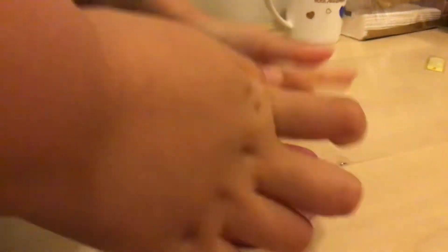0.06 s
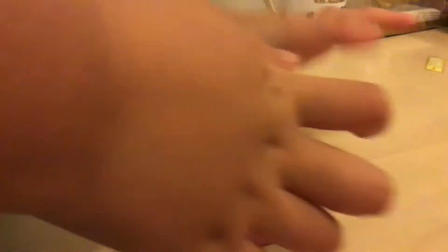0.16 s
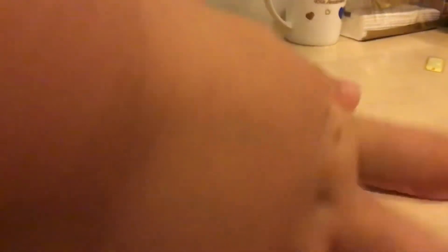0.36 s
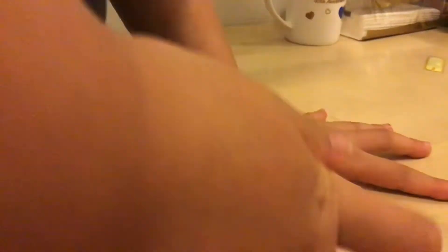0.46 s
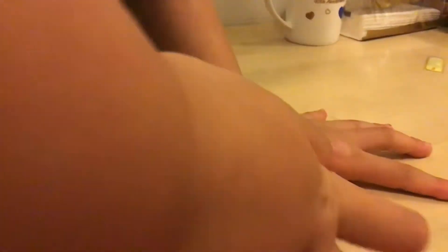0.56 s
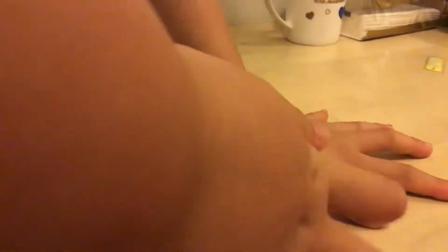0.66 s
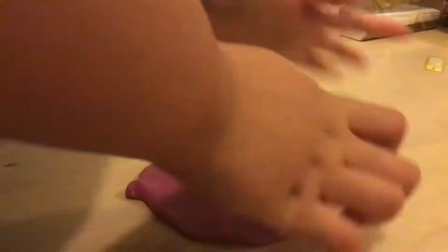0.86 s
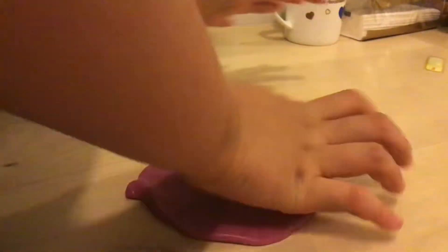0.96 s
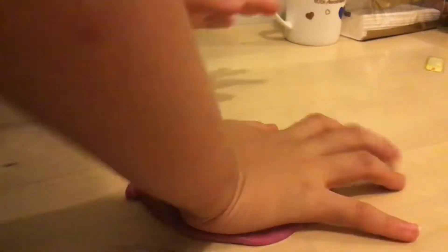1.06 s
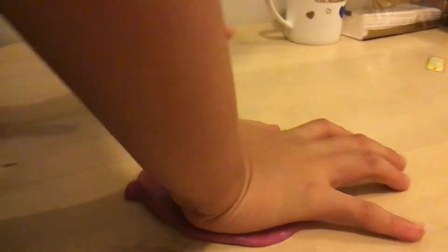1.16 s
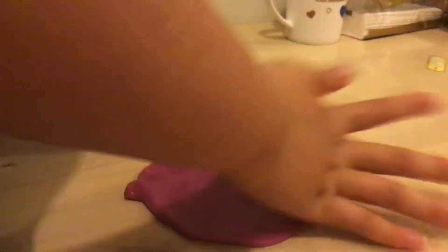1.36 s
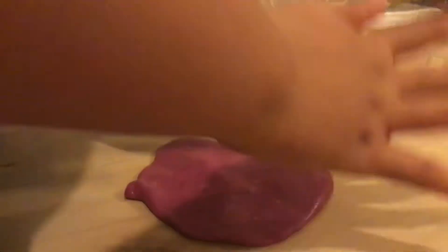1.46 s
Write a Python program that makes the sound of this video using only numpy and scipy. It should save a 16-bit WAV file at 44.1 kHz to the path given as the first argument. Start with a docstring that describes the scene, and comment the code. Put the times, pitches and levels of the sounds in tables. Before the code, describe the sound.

One sharp, wet slap of putty on a wooden table, followed by faint sticky ticks.

```python
"""A low, steady hum fills a small, quiet room. Then a hand slaps soft putty flat on a wooden table.
The putty crackles wetly, trapped air snaps out, the table top thumps and rings, and the room
answers briefly. Afterwards the hand knocks softly on the table, and the putty gives two sticky
ticks, soft rubs and a faint squeak as the palm leans on it."""
import sys
import numpy as np
from scipy import signal
from scipy.fft import rfft, irfft
from scipy.io import wavfile

SR = 44100
rng = np.random.default_rng(int(sys.argv[2]) if len(sys.argv) > 2 else 0)


def output_pcm(signal):
    """Save a mono or channel-first signal as 16-bit PCM at the path in sys.argv[1].

    Samples are clipped to [-1, 1] before scaling.
    """
    pcm = np.clip(np.atleast_2d(signal).T, -1, 1) * 32767
    wavfile.write(sys.argv[1], SR, np.round(pcm).astype(np.int16))


N = 66150
T = np.arange(N) / SR
FREQS_HZ = np.fft.rfftfreq(N, 1 / SR)
SLAP_S = 0.2415   # when the putty lands


def from_db(db):
    """Turn decibels into a number to multiply by."""
    return 10 ** (np.asarray(db) / 20)


def rms_one(x):
    """Scale a sound so its average strength (rms) is 1."""
    return x / np.sqrt(np.mean(x ** 2) + 1e-20)


def noise(colour):
    """Noise of strength 1; the colour table says which pitches are stronger than others."""
    pitch_hz, level_db = np.array(colour).T
    curve_db = np.interp(np.log(np.maximum(FREQS_HZ, 1)), np.log(pitch_hz), level_db)
    return rms_one(irfft(rfft(rng.standard_normal(N)) * from_db(curve_db), N))


def drift(rate_hz):
    """A random wobble of strength 1; a higher rate wobbles faster."""
    return rms_one(irfft(rfft(rng.standard_normal(N)) / (1 + (FREQS_HZ / rate_hz) ** 4), N))


def click(time_s):
    """One instant push."""
    x = np.zeros(N) + 1e-18
    x[int(time_s * SR)] = 1
    return x


def ring(force, modes):
    """A push sets off fading tones (modes); each takes its ring_s to fall by 60 dB."""
    out = 0
    for pitch_hz, level_db, ring_s in modes:
        decay = np.exp(-np.log(1000) / (ring_s * SR))
        angle = 2 * np.pi * pitch_hz / SR
        tone = signal.lfilter([0, np.sin(angle)], [1, -2 * decay * np.cos(angle), decay ** 2], force)
        out = out + from_db(level_db) * tone
    return out


def swells(rows):
    """Loudness rises and falls in a bell shape for each row."""
    return sum(from_db(level_db) * np.exp(-.5 * ((T - peak_s) / half_width_s) ** 2)
               for peak_s, level_db, half_width_s in rows)


def filtered(x, kind, edge_hz, order):
    """Keep the low pitches, the high ones or a band; a higher order cuts more steeply."""
    return signal.sosfilt(signal.butter(order, edge_hz, kind, fs=SR, output="sos"), x)


# the tones of the hum: pitch_hz, level_db
HUM_TONES = [(86.1, -62), (150.7, -68.5), (199.2, -62.5), (262.5, -61.5), (495.3, -75.5), (593, -64.5)]
def hum():
    """An appliance hums, each tone wavering gently."""
    out = 0
    for pitch_hz, level_db in HUM_TONES:
        waver = 1 + 0.056 * (drift(rate_hz=15) + 1j * drift(rate_hz=15))   # in loudness and pitch
        tone = np.exp(2j * np.pi * (pitch_hz * T + rng.random()))
        out = out + from_db(level_db) * rms_one(np.real(waver * tone))
    return out


# the colour of the quiet room: pitch_hz, level_db
ROOM_TONE_COLOUR = [(25, -36), (45, -13), (65, -14.5), (90, 3), (115, -2.5), (140, -5.5), (200, -8),
                    (270, -9), (330, -10), (450, -14), (640, -8.5), (780, -13), (1020, -23), (1600, -19),
                    (2400, -21), (4000, -28.5), (5500, -30.5), (7500, -41.5), (8800, -35.5), (11000, -45),
                    (15500, -49.5), (16500, -50)]
def room_tone():
    """A faint, low rush of air that never stops."""
    return from_db(-55) * noise(ROOM_TONE_COLOUR)


# the colour of the wet crackle: pitch_hz, level_db
CRACKLE_COLOUR = [(300, 9.5), (1500, 5.5), (2500, 3), (4500, 1.5), (6000, -2), (7800, -14), (10000, -9),
                  (16000, -30)]
# air pockets bursting: peak_s, level_db, half_width_s
AIR_POCKETS = [(.2385, -49, 0.00094), (.2475, -33, 0.00062)]
def squish():
    """The putty lands edge first and spreads with a brief wet crackle."""
    lead_s, rise_s, fall_s = 0.0033, 0.0015, 0.0028
    age_s = T - SLAP_S
    loudness = np.exp(-np.abs(age_s) / np.where(age_s < 0, rise_s, fall_s)) * (age_s > -lead_s)
    return (from_db(-23) * loudness + swells(AIR_POCKETS)) * noise(CRACKLE_COLOUR)


# the very short tones in the snap: pitch_hz, level_db, ring_s
SNAP_TONES = [(970, -31, 0.0054), (1940, -17.5, 0.0031), (3400, -14.5, 0.0013), (4260, -4.5, 0.0024),
              (5400, -8.5, 0.0016), (10400, -9, 0.00056), (13500, -20, 0.001)]
def snap():
    """Air trapped under the putty escapes in one sharp pulse."""
    pulse_s = 0.00021   # the pressure has all but gone by then
    pulse = np.exp(-np.arange(64) / (pulse_s * SR / 8))
    pressure = signal.lfilter(pulse / pulse.sum(), [1], click(SLAP_S))
    return from_db(-1) * ring(pressure, SNAP_TONES)


def puff():
    """Air squeezed from under the palm pops dully, just ahead of the thump."""
    pitch_hz, level_db, ring_s = 317, -6.5, 0.0047
    return -ring(click(SLAP_S + 0.001), [(pitch_hz, level_db, ring_s)])


# the tones of the wooden table top: pitch_hz, level_db, ring_s, linger_db
WOOD_TONES = [(66, -39.5, 0.059, -33), (112.1, -31, 0.023, -28), (183.8, -14, 0.025, -40.5),
              (254.4, -22, 0.027, -41), (321, -16, 0.013, -42.5), (428, -20, 0.056, -37),
              (534, -28, 0.042, -45), (729, -14.5, 0.048, -36.5), (937, -15, 0.026, -64),
              (1055, -20, 0.017, -37.5), (1301, -30.5, 0.03, -60), (1505, -19, 0.01, -48.5),
              (1900, -35, 0.008, -57)]
def table_top(force, linger_s=0.36):
    """Most of each tone dies fast under the hand, but a little lingers."""
    out = 0
    for k, (pitch_hz, level_db, ring_s, linger_db) in enumerate(WOOD_TONES):
        tone = ring(force, [(pitch_hz, level_db, ring_s), (pitch_hz, linger_db, linger_s)])
        out = out + (-1) ** k * tone   # neighbouring tones swing in opposite directions
    return out


def thump():
    """The hand's cushioned weight follows the snap and sets the table top ringing."""
    force = filtered(click(SLAP_S + 0.002496), "low", 3500, order=1)
    return from_db(-1) * table_top(force)


# the room's echo, band by band: pitch_hz, level_db, ring_s
ECHO_BANDS = [(60, -3.5, .35), (130, 5.5, 0.12), (314, 9, 0.21), (540, -3.5, 0.3), (770, -8, 0.5),
              (1470, -8.5, 0.28), (2070, -23.5, 0.42), (4600, -22, 0.32), (7900, -41, 0.31),
              (11000, -41.5, 0.33), (16000, -48, 0.21)]
def room_echo(delay_s=0.0055, build_s=0.0031):
    """The room's answer to a click: reflections build up fast, then each band fades at its own pace."""
    spectrum = rfft(noise([row[:2] for row in ECHO_BANDS]))
    age_s = np.maximum(T - delay_s, 0)
    centres = np.log([row[0] for row in ECHO_BANDS])
    out = 0
    for share, (_, _, ring_s) in zip(np.eye(len(ECHO_BANDS)), ECHO_BANDS):
        band = irfft(spectrum * np.interp(np.log(FREQS_HZ + 1), centres, share), N)
        out = out + band * np.exp(-np.log(1000) * age_s / ring_s)
    return out * (1 - np.exp(-age_s / build_s))


# soft pushes of the hand on the table: start_s, level_db, pitch_hz, width_octaves
HAND_KNOCKS = [(0.457, -20, 117, 0.93), (.778, -28.5, 730, .3), (1.035, -19, 71.5, 1.0)]
def knocks():
    """Each soft touch mainly wakes the table's tones near its own pitch."""
    force = 0
    for start_s, level_db, pitch_hz, width_octaves in HAND_KNOCKS:
        spread = 2 ** (width_octaves / 2)
        push = filtered(click(start_s), "band", [pitch_hz / spread, pitch_hz * spread], order=2)
        force = force + from_db(level_db) * push
    return table_top(force)


# the sticky ticks: peak_s, level_db, half_width_s
STICKY_TICKS = [(.7178, -46.5, 0.0024), (.7768, -56, 0.00043)]
# their colour: pitch_hz, level_db
STICKY_COLOUR = [(1000, -1), (2400, -20), (3100, 2), (3550, -9), (4100, 3.5), (4700, -0.5), (5300, -3),
                 (6200, -5), (7200, -5.5), (8000, -11), (12000, -14.5), (16000, -27)]
def ticks(room):
    """Skin sticks to putty and makes tiny grainy ticks, which echo in the room."""
    grain = rms_one(noise(STICKY_COLOUR) * from_db(drift(rate_hz=1400)))
    direct = swells(STICKY_TICKS) * grain
    echo = rms_one(signal.fftconvolve(direct, room)[:N])
    return direct + from_db(-3.5) * np.std(direct) * echo


# the rubs of the palm: peak_s, level_db, half_width_s
PALM_RUBS = [(.756, -62.5, 0.031), (1.05, -73, 0.07), (1.31, -61.5, 0.023)]
# their colour: pitch_hz, level_db
PALM_COLOUR = [(600, 16.5), (1500, 3), (4500, 11.5), (7500, 1), (10000, -3), (14000, -3), (16000, -6)]
def rubs():
    """The palm rubs and peels off the putty with a soft, grainy hiss."""
    grain = rms_one(noise(PALM_COLOUR) * from_db(-3 * drift(rate_hz=500)))
    return swells(PALM_RUBS) * grain


# the squeak: peak_s, level_db, half_width_s
SKIN_SQUEAK = [(1.087, -74, 0.0091)]
# its colour: pitch_hz, level_db
SKIN_COLOUR = [(7500, -27), (10000, -5), (11200, 2), (12800, -11), (15000, -18)]
def squeak():
    """Skin on putty gives one faint, very high squeak."""
    return swells(SKIN_SQUEAK) * noise(SKIN_COLOUR)


def scene():
    """The slap, its echo and the small hand sounds over the hum, in one channel."""
    room = room_echo()
    slap = squish() + snap() + puff() + thump()
    echo = from_db(-26.5) * signal.fftconvolve(click(SLAP_S), room)[:N]
    # the microphone loses the deep bass of the blows
    blows = filtered(slap + echo + knocks(), "high", 66, order=3)
    return (blows + ticks(room) + rubs() + squeak() + hum() + room_tone())[None]


def record(dry):
    """Cut away the very highest treble."""
    cutoff_hz = 16500
    return signal.sosfilt(signal.ellip(10, .2, 70, cutoff_hz, fs=SR, output="sos"), dry)


dry = scene()
out = record(dry)
output_pcm(out)
```